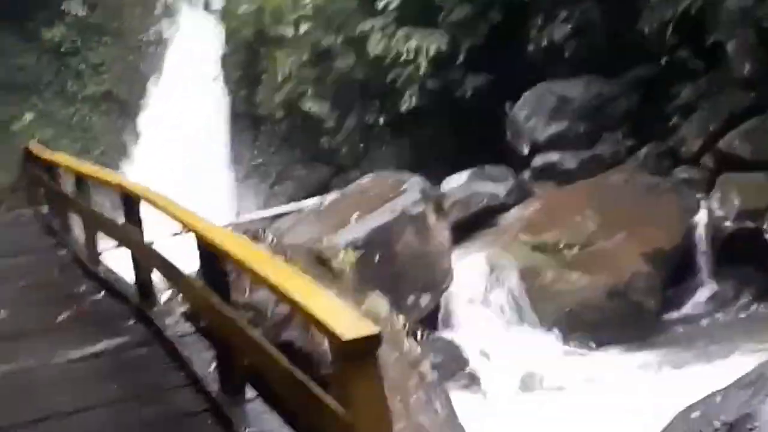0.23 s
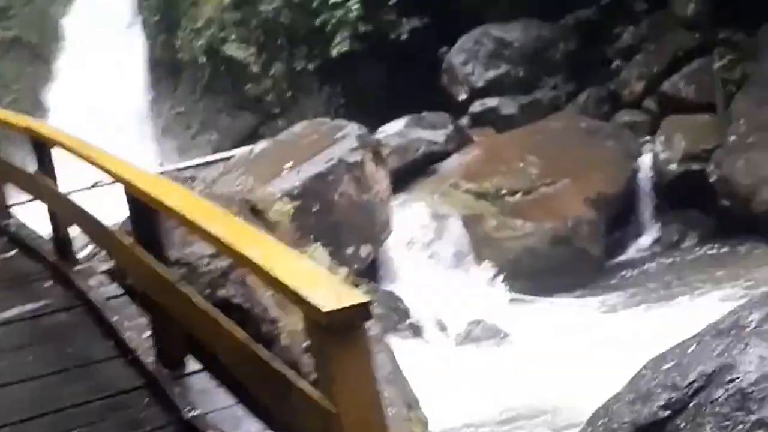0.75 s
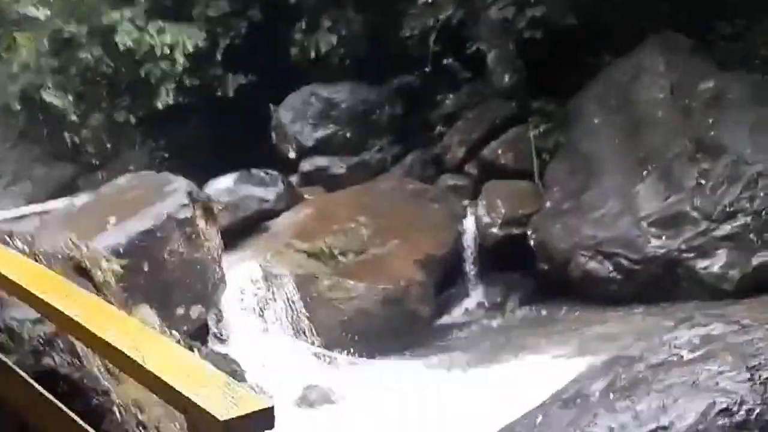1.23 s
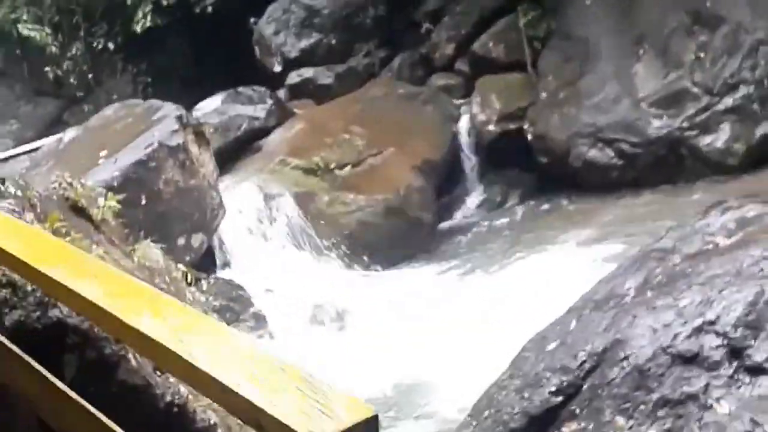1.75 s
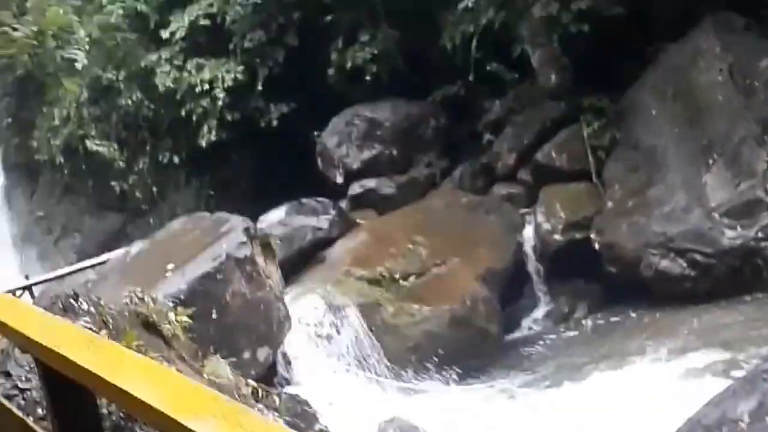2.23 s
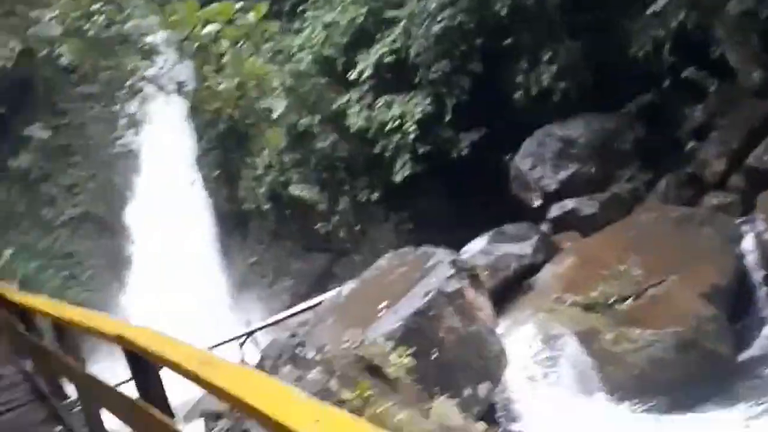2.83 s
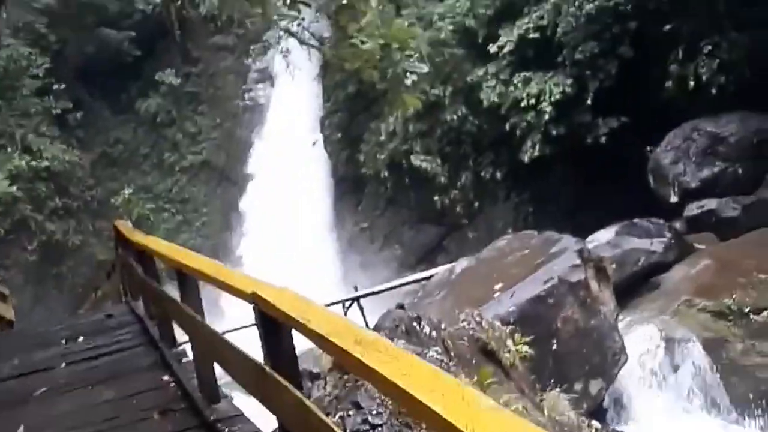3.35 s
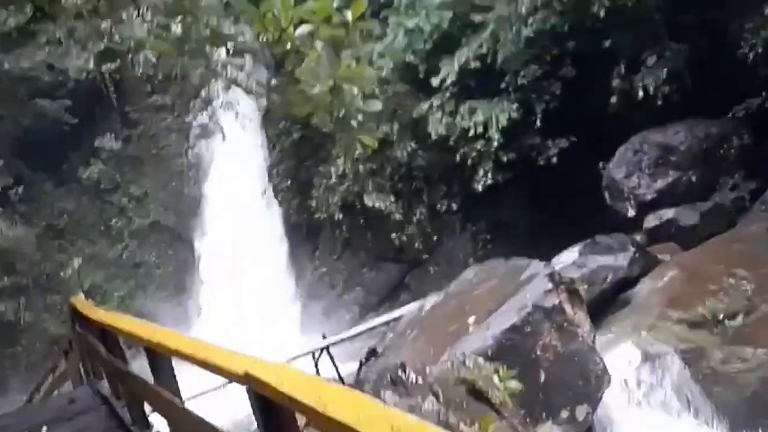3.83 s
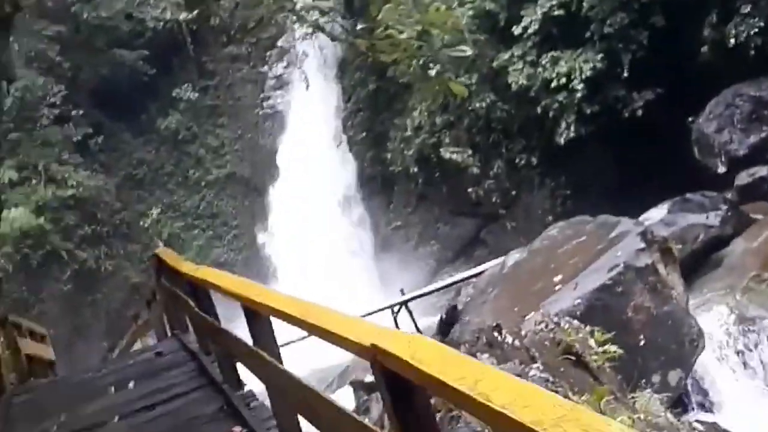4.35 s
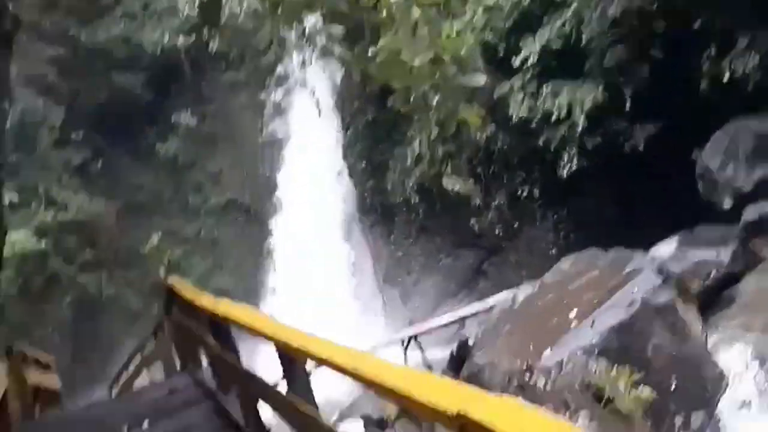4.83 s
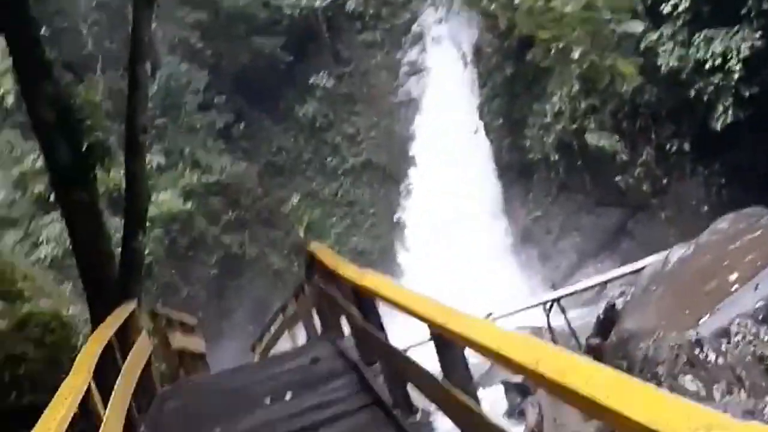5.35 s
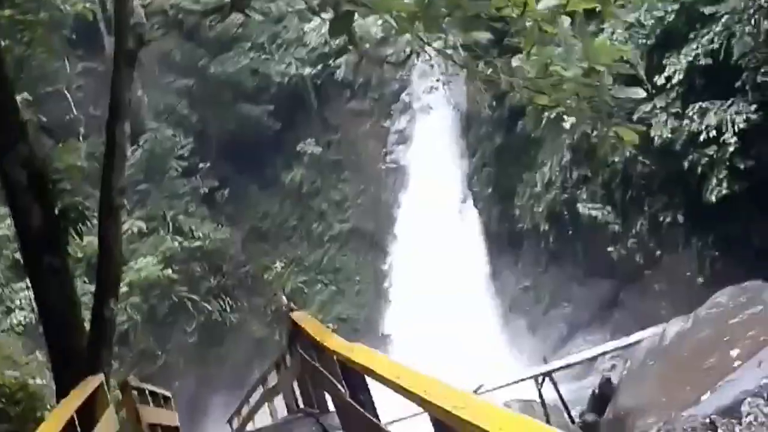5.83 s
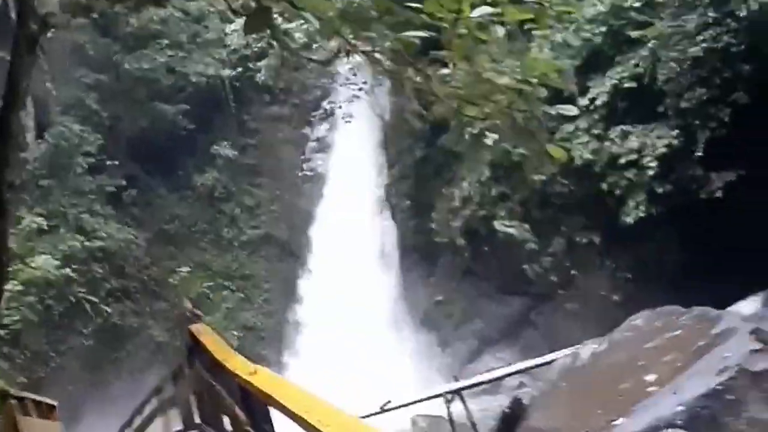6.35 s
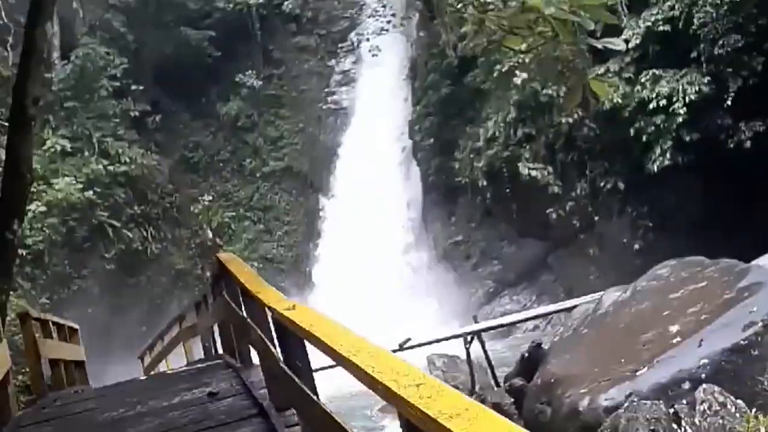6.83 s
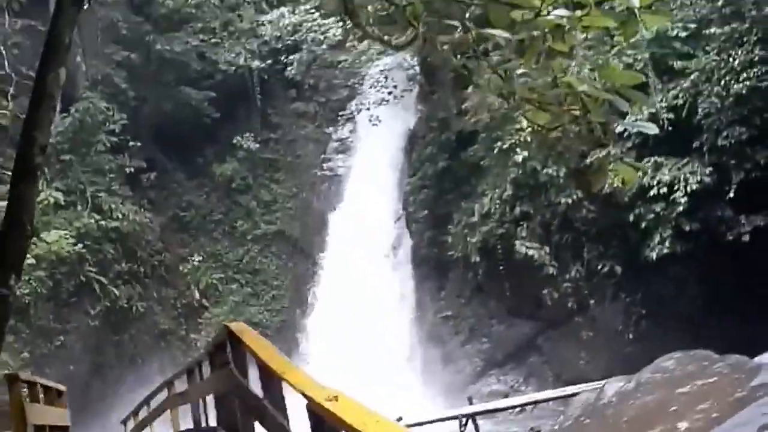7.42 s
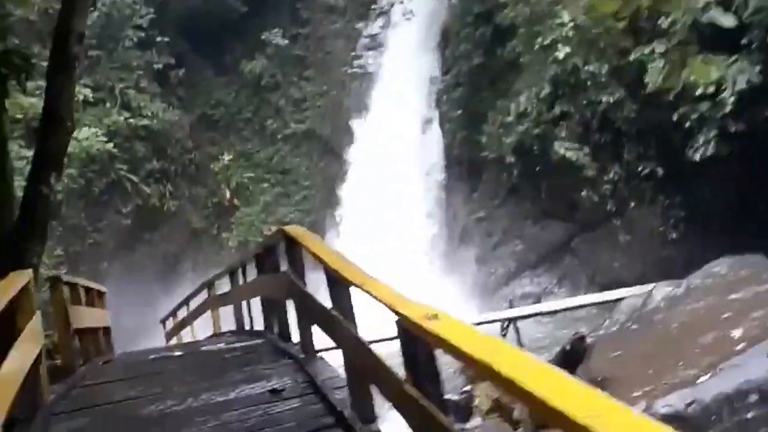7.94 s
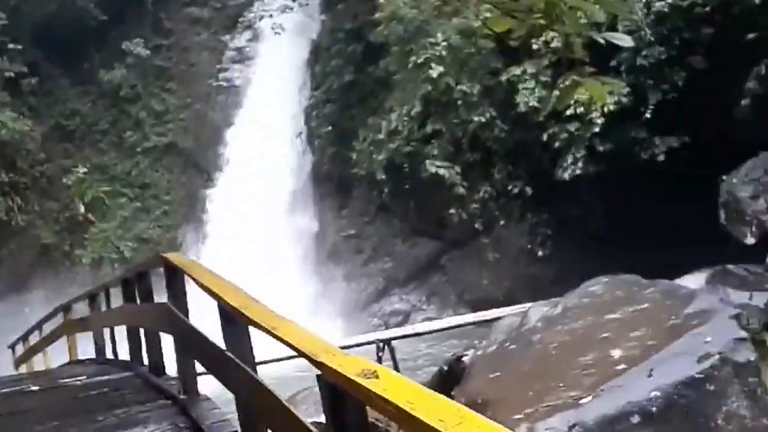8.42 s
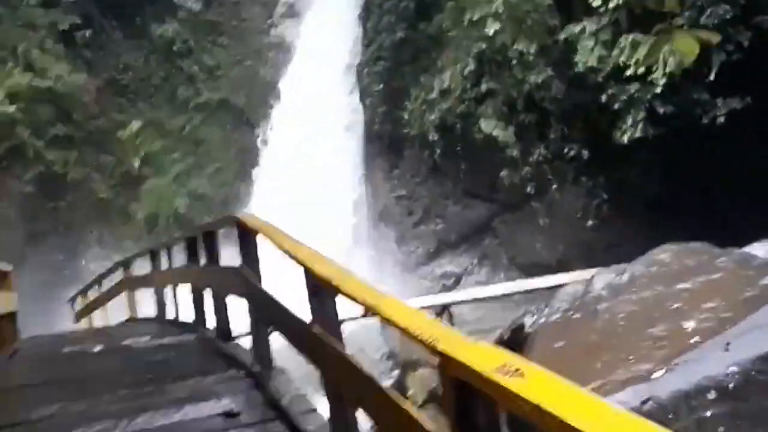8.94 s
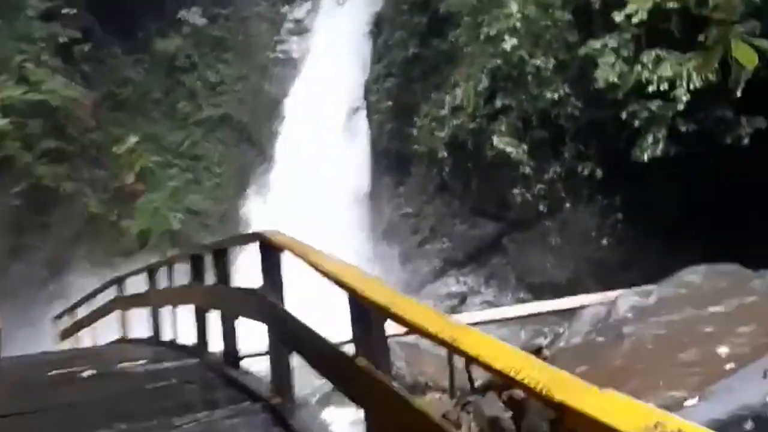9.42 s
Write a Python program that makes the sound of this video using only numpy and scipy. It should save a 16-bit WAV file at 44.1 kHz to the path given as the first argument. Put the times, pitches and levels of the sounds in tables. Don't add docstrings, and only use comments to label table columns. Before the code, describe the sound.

A large waterfall roars into a rocky pool, close and continuous, heard on a hand-held phone in stereo. Almost at once a finger seals the left microphone with a loud crackling thump, and the water sinks much quieter. Small rubs and one tiny silent gap follow. A second jolt comes as the finger lifts, the level sinks again, then the full roar returns and its boom grows.

```python
import sys
import numpy as np
from scipy import signal
from scipy.fft import rfft, irfft, next_fast_len
from scipy.io import wavfile
from scipy.ndimage import uniform_filter1d

SR = 44100
rng = np.random.default_rng(int(sys.argv[2]) if len(sys.argv) > 2 else 0)


def dump(signal):
    limited = np.clip(np.atleast_2d(signal).T, -1, 1)
    pcm = np.round(limited * 32767).astype(np.int16)
    wavfile.write(sys.argv[1], SR, pcm)


def ratio_of_db(decibels):
    return 10 ** (np.asarray(decibels, float) / 20)


N = 426447

# (frequency [Hz], level [dB per Hz])
LEFT_CUPPED = [(30, -70), (70, -69), (200, -54), (450, -58), (1000, -61), (1800, -60.5), (2800, -54),
               (4000, -70.8), (5000, -84.5), (5900, -92), (7500, -94), (8800, -93.5), (10700, -91),
               (15500, -94)]
LEFT_NEAR = [(30, -86), (70, -59.5), (200, -53), (450, -56), (1000, -57.5), (1800, -58), (2800, -67),
             (4000, -60.5), (5000, -65), (5900, -69), (7500, -68), (8800, -72), (10700, -70),
             (15500, -82.5)]
LEFT_FREE = [(30, -79), (70, -61.5), (200, -53), (450, -57.5), (1000, -60.5), (1800, -62.5), (2800, -64.5),
             (4000, -67), (5000, -67.5), (5900, -69.0), (7500, -73), (8800, -72.5), (10700, -72.9),
             (15500, -85)]
# (frequency [Hz], level [dB per Hz])
RIGHT_EARLY = [(30, -71), (70, -65.6), (200, -53.5), (450, -59.5), (1000, -60), (1800, -58.7), (2800, -64),
               (4000, -64), (5000, -66), (5900, -69.5), (7500, -67), (8800, -79), (10700, -75.5),
               (15500, -82)]
RIGHT_NEAR = [(30, -86), (70, -60.5), (200, -54.0), (450, -57.5), (1000, -59), (1800, -57.5), (2800, -67.5),
              (4000, -63.5), (5000, -64.5), (5900, -71), (7500, -67.8), (8800, -75), (10700, -74.8),
              (15500, -83)]
RIGHT_FREE = [(30, -82), (70, -60.5), (200, -51.5), (450, -56.5), (1000, -58.5), (1800, -54.5), (2800, -66),
              (4000, -64), (5000, -64), (5900, -68), (7500, -69), (8800, -76), (10700, -72.5),
              (15500, -81.5)]
# (frequency [Hz], likeness [0-1])
PORT_LIKENESS = [(60, 0.93), (130, 1), (290, 0.97), (640, 0.91), (1410, 0.51), (3100, 0.14), (6820, 0.024),
                 (15000, 0.0076)]
# (frequency [Hz], level [dB])
PORT_RIPPLE = [(330, 0), (500, -2.1), (720, 1.96), (1000, 0)]
# (frequency [Hz], level [dB per Hz])
MIC_HISS = [(300, -103), (2000, -110), (8800, -114), (10700, -103), (15500, -119)]
# (time [s], level [dB], sign [+-1], sharpness [Hz])
SLIPS = [(0.452, -0.5, -1, 1700), (0.456, 1, -1, 700), (0.474, -3, -1, 1200), (0.4762, -0.5, 1, 800),
         (0.4968, -6, -1, 1000), (0.4975, -3, 1, 900), (0.501, -1, -1, 500), (0.527, -3, 1, 400),
         (0.6493, -21, -1, 400), (1.383, -24, 1, 250), (1.386, -16, -1, 250), (1.395, -21, 1, 250),
         (1.73, -16, 1, 500), (1.7445, -18, 1, 900), (1.857, -15, 1, 8000), (1.8581, -12, -1, 5000),
         (2.224, -1.5, -1, 500), (2.2399, -6, 1, 2500), (2.241, -9, -1, 2500), (2.2487, 4.5, -1, 2000),
         (2.2557, -6, -1, 4600)]
# (peak time [s], hold [s], level [dB], fade [dB per s])
STROKES = [(0.454, .03, -8.5, 500), (0.513, .008, -19, 600), (0.582, .02, -31, 90), (.86, .02, -47, 200),
           (.97, .025, -49, 399), (1.167, .015, -52, 300), (1.384, 0.021, -33, 500), (1.73, 0.01, -31, 450),
           (1.867, .015, -31, 250), (1.945, .01, -40, 400), (2.06, 0.055, -45, 200), (2.18, .02, -41, 200),
           (2.228, .033, -15.5, 1400)]
# (sinking time [s], recovery time [s])
GAIN_SINKS = [
    (.47, 1.635),
    (2.27, 3.351),
]
# (time [s], half width [s], depth [dB])
LIMITER_DUCKS = [
    (0.458, .011, 21.5),
    (2.252, 0.01, 11),
]

# start [s], duration [s]
SEAL, LIFT, REGRIP = (0.452, 0.064), (2.228, 0.041), (6.38, 0.27)


def evened(x):
    return x / np.sqrt(np.mean(x ** 2) + 1e-20)


def read(points, hz):
    f, value = np.transpose(points)
    return np.interp(np.log(hz + 1), np.log(f + 1), value)


def colour(x, points):
    size = next_fast_len(N)
    response = ratio_of_db(read(points, np.fft.rfftfreq(size, 1 / SR)))
    return irfft(rfft(x, size) * response, size)[:N] * np.sqrt(SR / 2)


def move(start, takes):
    return np.clip((np.arange(N) / SR - start) / takes, 0, 1)


def water(patchy_db=0.5, swell_db=-0.2, splash_db=0.5, lumpy_db=0.5, left_lag_s=0.00006):
    frames = N // 128 + 5
    hz = np.fft.rfftfreq(512, 1 / SR)[:, None]
    a, b, c, d, patches = rng.standard_normal((frames, 257, 5)).T
    patches = uniform_filter1d(patches, size=6, axis=0)
    patches = evened(uniform_filter1d(patches, size=24, axis=1))
    swell, splash, lumps = rng.standard_normal((frames, 3)).T
    swell = evened(uniform_filter1d(swell, size=60))
    splash = evened(uniform_filter1d(splash, size=4))
    lumps = evened(uniform_filter1d(lumps, size=16))

    field_db = read(PORT_RIPPLE, hz) + patchy_db * patches + swell_db * swell
    field_db = field_db + splash_db * splash * (hz > 1500)
    field_db = field_db + lumpy_db * lumps / (1 + (hz / 300) ** 2)

    same = np.clip(read(PORT_LIKENESS, hz), -1, 1)
    late = np.exp(-2j * np.pi * hz * left_lag_s)
    right = a + 1j * b
    left = same * late * right + np.sqrt(1 - same ** 2) * (c + 1j * d)
    ports = np.array([left, right]) * ratio_of_db(field_db)
    return evened(signal.istft(ports, nperseg=512, noverlap=384)[1][:, :N])


def fall(cupped_share=0.96, drawn_share=0.8, cupped_late=0.05, turn_early=0.15, turn_s=0.5,
         walk_s=3, boom_db=-0.36, boom_db_per_s=0.37, pan_db=-0.85, pan_drawn_db=2.5):
    left, right = water()
    t = np.arange(N) / SR
    drawn = drawn_share * move(*REGRIP)
    cupped = cupped_share * (1 - move(*SEAL)) ** 1.6 + cupped_late * drawn
    opened = move(*LIFT) - cupped_late * drawn
    turned_by_lift = turn_early * move(0, LIFT[0])
    turned = 1 - (1 - turned_by_lift) * np.exp(-np.maximum(t - LIFT[0], 0) / turn_s)

    left_open = (1 - drawn) * colour(left, LEFT_NEAR) + drawn * colour(left, LEFT_FREE)
    right_turned = (1 - drawn) * colour(right, RIGHT_NEAR) + drawn * colour(right, RIGHT_FREE)
    left_port = cupped * colour(left, LEFT_CUPPED) + opened * left_open
    right_port = (1 - turned) * colour(right, RIGHT_EARLY) + turned * right_turned
    ports = np.array([left_port, right_port])

    boom = signal.sosfiltfilt(signal.butter(2, 420, fs=SR, output="sos"), ports)
    boom_gain = ratio_of_db(boom_db + boom_db_per_s * np.maximum(t - walk_s, 0))
    ports = ports + boom * (boom_gain - 1)
    return ports * ratio_of_db(np.outer([0.5, -0.5], pan_db + pan_drawn_db * drawn))


def microphone_hiss():
    return np.array([colour(rng.standard_normal(N), MIC_HISS) for _ in range(2)])


def rubbing(rest_db=-62, rest_late_db=-52, hard_rise_s=0.004, soft_rise_s=0.032, hard_db=-18):
    t = np.arange(N) / SR
    level_db = rest_db + (rest_late_db - rest_db) * move(SEAL[0], LIFT[0] - SEAL[0]) ** 3
    for s, hold, db, fade in STROKES:
        rise = hard_rise_s + (soft_rise_s - hard_rise_s) / (1 + ratio_of_db(2 * (db - hard_db)) ** 2)
        shape_db = 25 * np.minimum(t - s, 0) / rise - fade * np.maximum(t - s - hold, 0)
        level_db = np.maximum(level_db, db + shape_db)
    touching = (t > SEAL[0] - hard_rise_s) * (t < LIFT[0] + 1.5 * LIFT[1])
    return ratio_of_db(level_db) * touching


def low_cut(x, hz=78, damping=0.76, sub_hz=55):
    w = 2 * np.pi * hz
    ringing = signal.lfilter(*signal.bilinear([1, 0, 0], [1, damping * w, w * w], SR), x)
    return signal.lfilter(*signal.butter(1, sub_hz, "high", fs=SR), ringing)


def slip_push(hz):
    u = np.arange(600) / SR
    push = u * np.exp(-u * 2 * np.pi * 2 * hz)
    return push / push.sum()


def skin_creep(per_s=900, spread_db=0.5, soft_hz=420, scratch_db=-21):
    jumps = ratio_of_db(spread_db * np.minimum(rng.exponential(1, N), 4)) * rng.choice([-1., 1.], N)
    steps = np.cumsum(jumps * (rng.random(N) < per_s / SR))
    creep = evened(low_cut(signal.lfilter(*signal.butter(2, soft_hz, fs=SR), steps)))
    ridges = signal.butter(2, [350, 2200], "band", fs=SR)
    scratch = evened(signal.lfilter(*ridges, rng.standard_normal(N)))
    return creep + ratio_of_db(scratch_db) * scratch


def finger(rub_db=-3, crackle_per_s=600, crackle_db=13, crackle_hz=1600):
    strength = rubbing()
    crackle = ratio_of_db(crackle_db) * strength ** 2 * rng.uniform(-1.1, 1, N)
    crackle = crackle * (rng.random(N) < crackle_per_s / SR)
    pressure = signal.oaconvolve(crackle, slip_push(crackle_hz))[:N]
    for s, db, sign, hz in SLIPS:
        at = round(s * SR) - 4
        pressure[at:at + 600] += np.sign(sign) * ratio_of_db(db) * slip_push(hz)
    return low_cut(np.cumsum(pressure)) + skin_creep() * strength * ratio_of_db(rub_db)


def gain_db(depth_db=15, sink_s=0.13, recover_s=0.091):
    t, down = np.arange(N) / SR, np.zeros(N)
    for start, end in GAIN_SINKS:
        sunk = 1 - np.exp(-(np.maximum(t - start, 0) / sink_s) ** 1.15)
        down += depth_db * sunk * np.exp(-np.maximum(t - end, 0) / recover_s)
    for s, half, db in LIMITER_DUCKS:
        down += db * np.exp(-((t - s) / half) ** 4)
    return -down


def scene():
    mix = (fall() + microphone_hiss()) * ratio_of_db(gain_db())
    mix[0] += finger()
    return mix


def band_limit(x):
    return signal.sosfilt(signal.butter(12, 15710, fs=SR, output="sos"), x)


def record(dry):
    t = np.arange(N) / SR
    live = uniform_filter1d(1. * ((t < 1.007) | (t > 1.146)), size=20)
    mix = np.tanh(dry * 1.031) / 1.07 * live
    return band_limit(mix)


dry = scene()
out = record(dry)
dump(out)
```